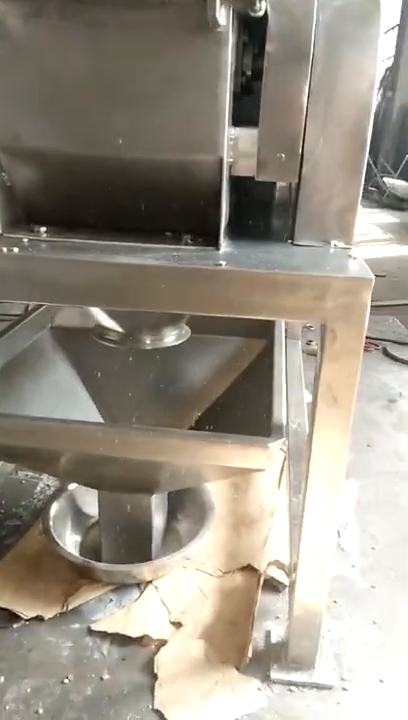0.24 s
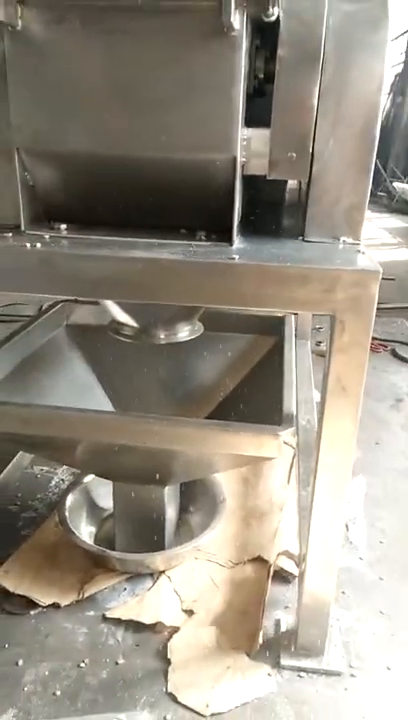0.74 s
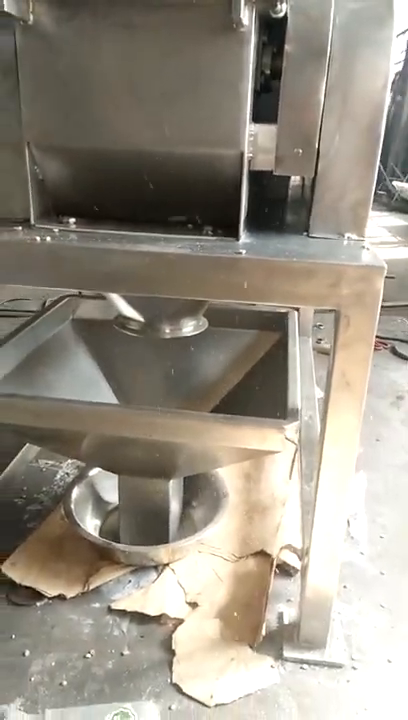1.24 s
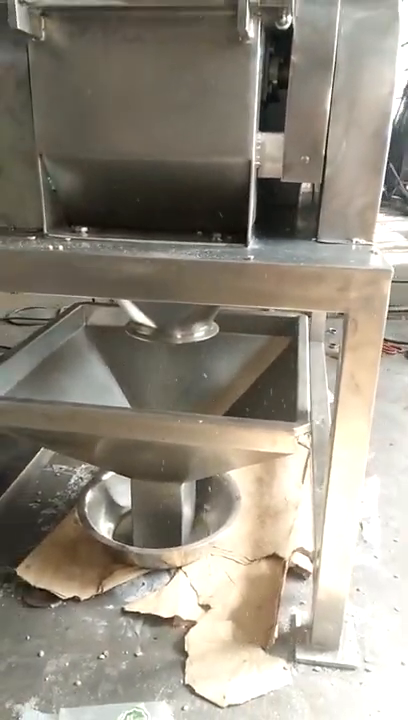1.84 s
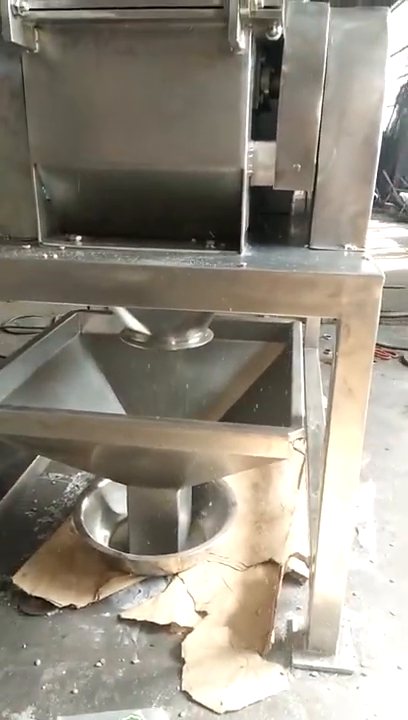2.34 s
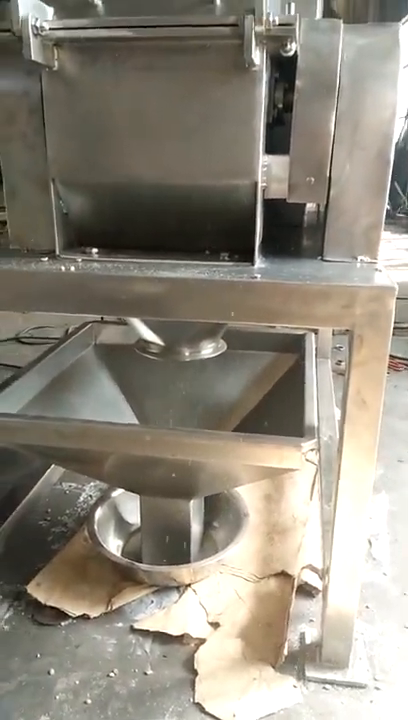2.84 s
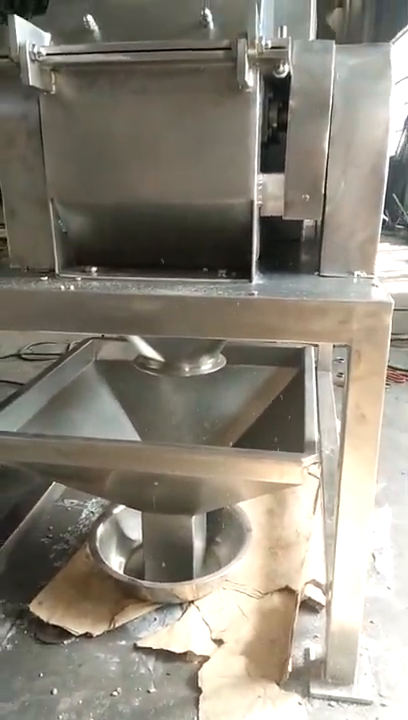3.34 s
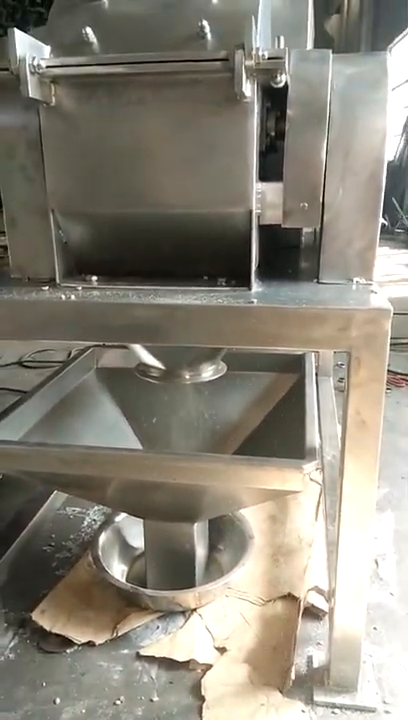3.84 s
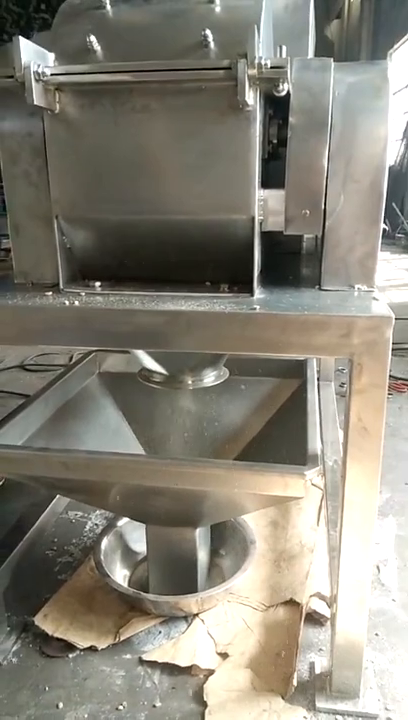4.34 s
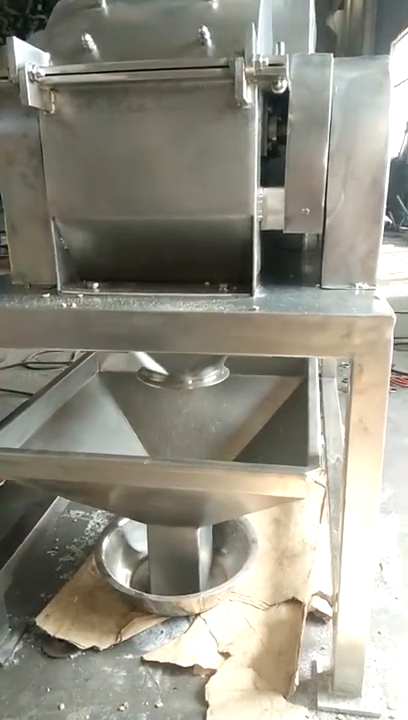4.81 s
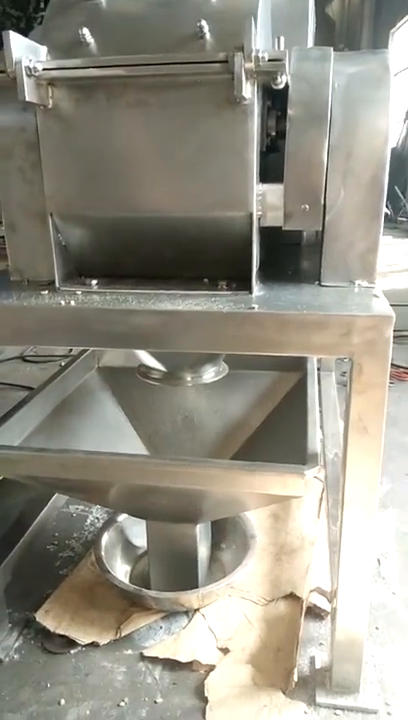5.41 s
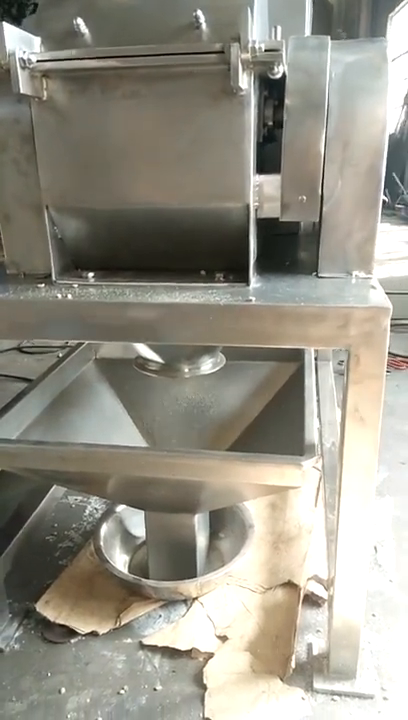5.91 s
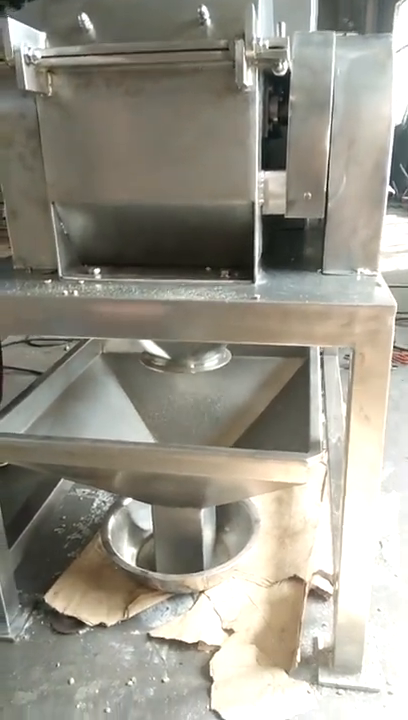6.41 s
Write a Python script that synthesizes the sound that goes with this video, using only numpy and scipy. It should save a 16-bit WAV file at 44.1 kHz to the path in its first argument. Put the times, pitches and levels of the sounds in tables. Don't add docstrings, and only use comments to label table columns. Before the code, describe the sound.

A steel hammer mill runs steadily indoors, droning and roaring with harsh hiss as broken beans rattle in bursts down a metal chute.

```python
import sys
import numpy as np
from scipy import signal
from scipy.fft import rfft, irfft
from scipy.io import wavfile
from scipy.ndimage import uniform_filter1d

SR = 44100
rng = np.random.default_rng(int(sys.argv[2]) if len(sys.argv) > 2 else 0)


def amplitude_ratio(level_db):
    exponent = np.asarray(level_db, float) / 20
    return 10 ** exponent


def wrap_up_sound(samples):
    columns = np.atleast_2d(samples).T
    tamed = np.clip(columns, -1, 1)
    steps = np.round(tamed * 32767).astype(np.int16)
    wavfile.write(sys.argv[1], SR, steps)


N = 293706

# (frequency [Hz], density [dB per Hz])
ROAR_SPECTRUM = [(30, -116), (60, -80.5), (120, -66), (250, -66), (450, -60), (750, -55.5), (1000, -57.5),
                 (1700, -56), (2200, -54.5), (2800, -48.5), (4200, -50.5), (5800, -60.5), (8500, -77.5),
                 (14200, -89.5)]


def evened(x):
    return x / np.sqrt(np.mean(x ** 2) + 1e-20)


def read(points, hz):
    f, value = np.transpose(points)
    return np.interp(np.log(hz + 1), np.log(f + 1), value)


def wander(count, knots):
    rough = rng.standard_normal((count, knots))
    place = np.linspace(0, knots - 1, N // 64 + 1)
    return np.array([np.interp(place, np.arange(knots), row) for row in rough])


def tones(turns, level_db, start):
    out = np.zeros(N)
    for turn, db, phase in zip(turns, level_db, start):
        wave = np.cos(np.float32(2 * np.pi * (turn + phase)))
        out += np.repeat(amplitude_ratio(db), 64)[:N] * wave
    return np.sqrt(2) * out


def rotor(hum_db=0.07, flutter_db=-0.2, whine_flutter_db=5.5, faint_db=2.0, faint_drift_db=7.0,
          judder_turns=0.0029):
    # (time [s], speed [rpm])
    rotor_speed = [
        (0, 2594.2),
        (2.3, 2591.6),
        (4.3, 2588.2),
        (6.66, 2586.5),
    ]
    # (multiple of rotor speed, direct rms [dB], echo lag at the start [cycles])
    hum_lines = [(4, -33.0, 0.51), (5, -44.0, 0.37), (6, -35.5, 0.47), (7, -26.5, 0.28), (8, -26.0, 0.41),
                 (9, -39.5, 0.22), (11, -39.5, 0.44), (12, -40.0, 0.44), (13, -41.0, 0.41),
                 (14, -26.5, 0.43), (15, -32.0, 0.28), (16, -35.5, 0.69), (17, -36.5, 0.35),
                 (18, -37.5, 0.86), (19, -42.5, 0.09), (20, -34.0, 0.11), (21, -46.5, 0.96),
                 (22, -49.0, 0.15), (23, -47.0, 0.3), (24, -40.0, 0.25), (25, -33.0, 0.07),
                 (26, -37.5, 0.76), (27, -45.5, 0.55), (28, -43.5, 0.96), (29, -51.5, 0.74),
                 (31, -52.5, 0.74), (33, -47.0, 0.91), (34, -49.5, 0.73), (35, -56.5, 0.94),
                 (36, -42.0, 0.97)]
    # (multiple of rotor speed, direct rms [dB], echo lag at the start [cycles])
    whine_lines = [(37, -46.0, 0.25), (38, -48.5, 0.74), (40, -52.5, 0.09), (41, -49.5, 0.75),
                   (42, -44.0, 0.03), (43, -38.0, 0.21), (44, -48.5, 0.74), (50, -44.5, 0.41),
                   (53, -42.0, 0.33), (54, -43.0, 0.9), (55, -44.0, 0.15), (56, -43.0, 0.48),
                   (57, -42.5, 0.94), (58, -45.5, 0.0), (59, -44.5, 0.42), (60, -42.5, 0.71),
                   (66, -48.0, 0.82), (67, -39.0, 0.67), (68, -54.0, 0.05), (71, -39.0, 0.11),
                   (72, -47.5, 0.82), (74, -45.0, 0.02), (75, -42.0, 0.21), (76, -42.0, 0.26),
                   (80, -49.5, 0.37), (88, -38.5, 0.7), (95, -40.5, 0.64), (101, -44.5, 0.89),
                   (103, -53.0, 0.73), (107, -41.0, 0.39)]
    panel_knocks = [(4, 8, 9, .77, .2), (10, 14, 14, .138, 0), (15, 15, 17, .41, 0), (18, 19, 22, .168, .2),
                    (23, 26, 28, .97, -.07)]
    t, slow = np.arange(N) / SR, np.arange(N // 64 + 1) * 64 / SR
    turns = np.cumsum(np.interp(t, *np.transpose(rotor_speed))) / 60 / SR % 1
    turns_per_s = rotor_speed[0][1] / 60

    strong, direct_db, lag = np.transpose([*hum_lines, *whine_lines])
    echo_gain = np.repeat([.8, .4], [len(hum_lines), len(whine_lines)])[:, None]
    detour_m, sound_m_per_s = .1, 343
    detour_s = detour_m / sound_m_per_s * slow / slow[-1]
    lag = lag[:, None] + np.outer(strong * turns_per_s, detour_s)
    strong_db = direct_db[:, None] + 20 * np.log10(abs(1 + echo_gain * np.exp(2j * np.pi * lag)))
    unrest_db = flutter_db + whine_flutter_db * strong[:, None] / 100
    strong_db += hum_db + unrest_db * wander(count=len(strong), knots=60)

    faint = np.setdiff1d(np.arange(30, 125), strong)
    drift_db = faint_drift_db * wander(count=len(faint), knots=9)
    over_roar_db = read(ROAR_SPECTRUM, faint * turns_per_s) + faint_db
    level_db = np.vstack([strong_db, over_roar_db[:, None] + drift_db])
    order = np.r_[strong, faint]
    start = rng.random(len(order))

    turns = turns + judder_turns * np.interp(t, slow, wander(count=1, knots=40)[0])
    for low, centre, high, delay, glide in panel_knocks:
        on_panel = (order >= low) & (order <= high)
        start = np.where(on_panel, glide * (order - centre) ** 2 - order * delay, start)
    slip = .65 * t / t[-1]
    return tones((k * turns + slip * (9 < k < 15) for k in order), level_db, start)


def fragments(per_s=6000, spread_db=2.5, gush=0.67, piece_db=43.0, ring_db=-29.5, spray_db=-30.5):
    # (time [s], level [dB])
    steady_flow = [
        (0, -52.5),
        (1.5, -48),
        (3.5, -46),
        (6.66, -45.5),
    ]
    # (time [s], level over the steady flow [dB], ebb [s])
    chute_gushes = [(0.139, 9, .03), (.3, 0, .04), (.65, 1, .05), (1.075, 14, .025), (1.19, 10, 0.054),
                    (1.35, -3, .03), (1.61, 4, .04), (2.19, 8, .08), (2.37, 2, .08), (2.69, 5, .1),
                    (2.99, 2, .08), (3.21, 0, .05), (3.82, 3, 0.067), (4.45, -1, .05), (4.6, 2, .02),
                    (5.45, 2, .04), (5.85, 2, .05), (6.12, -1, .05), (6.31, -1, 0.092)]
    # (time [s], peak level [dB])
    big_pieces = [(0.146, -37), (0.2944, -34), (0.3476, -37), (0.5694, -35), (0.6485, -32), (0.7094, -37),
                  (0.79, -39), (0.993, -38), (1.0705, -36), (1.087, -45), (1.1694, -40), (1.2194, -41),
                  (1.6194, -46), (2.1894, -39), (2.387, -36), (2.976, -38), (3.202, -38), (3.8117, -37),
                  (3.956, -38), (4.0287, -36), (4.37, -34), (4.596, -36), (4.777, -48), (5.063, -45),
                  (5.284, -46), (5.8945, -42), (6.12, -38), (6.304, -37)]
    chute_hz = [4890, 5190, 5370, 5630, 5770, 6390, 7400, 7540, 9060, 10910, 11490, 11670, 13010]
    # (level [dB], t60 [s])
    chute_rings = [(-3, 0.046), (-15.5, .05), (-2, 0.076), (-0.5, 0.032), (-2, 0.034), (-14, 0.034),
                   (-18.5, .04), (-12, .03), (-30, 0.036), (-23, 0.056), (-24, .03), (-23.5, .03),
                   (-27, .04)]
    # (frequency [Hz], density [dB per Hz])
    spray_spectrum = [(2500, -30), (4500, -0.5), (5800, 5), (7000, -7), (8500, -15.5), (11000, -16),
                      (14200, -15)]
    swell_share, rattle_s = 0.54, 0.011
    t = np.arange(N) / SR
    flow_db = np.interp(t, *np.transpose(steady_flow))
    for at, db, ebb in chute_gushes:
        pace_s = max(ebb, .01) * np.where(t < at, swell_share, 1)
        flow_db = flow_db + db * np.exp(-abs(t - at) / pace_s)
    power = amplitude_ratio(2 * gush * (flow_db + 47))
    for at, db in big_pieces:
        after = slice(round(at * SR), round(at * SR) + 4000)
        power[after] += amplitude_ratio(2 * (db + piece_db)) * np.exp(-(t[after] - at) / rattle_s)

    hit, patch = rng.random((2, N))
    spread = amplitude_ratio(spread_db * np.minimum(rng.exponential(1, N), 5))
    size = np.sqrt(power) * spread * (hit < per_s / SR)
    size *= rng.choice([-1., 1.], N)
    patch = (patch * len(chute_rings)).astype(int)
    ring, t = np.zeros(N), t[:4000]
    for k, (hz, (db, t60)) in enumerate(zip(chute_hz, chute_rings)):
        tap = amplitude_ratio(db - 60 * t / t60) * np.sin(2 * np.pi * hz * t)
        ring += signal.oaconvolve(size * (patch == k), tap)[:N]
    spray = irfft(rfft(size) * amplitude_ratio(read(spray_spectrum, np.fft.rfftfreq(N, 1 / SR))), N)
    return amplitude_ratio(ring_db) * evened(ring) + amplitude_ratio(spray_db) * evened(spray)


def roar(patchy_db=.2, drift_db=1.0, fill_db=1):
    stand_times = [.5, 6.1]
    # (frequency [Hz], width [Hz], lift at first stand [dB], at last stand [dB])
    housing_modes = [(320, 83, 12, 12), (420, 26, 5, 4.5), (591, 24, 4, 8), (845, 22, 8, 5.5),
                     (1106, 52, 7.5, 4), (1470, 180, 3.5, 3.5), (1690, 55, -5, -4), (1760, 53, 5, 5.5),
                     (2363, 240, 4, 4), (2893, 126, 4.5, 1), (3030, 40, -2, 4.5), (3190, 45, 3, 2),
                     (2724, 40, 6, 4.5), (3550, 67, -4, 3), (3900, 200, 1.5, 5), (4500, 84, 1.5, 5),
                     (771, 20, 12.5, 11.5), (124, 20, -7, -16), (484, 30, -0.5, -3), (970, 50, -2, -1.5),
                     (4400, 92, 4, -2), (2650, 55, -3.5, -4)]
    frames, hz = N // 512 + 5, np.fft.rfftfreq(2048, 1 / SR)
    a, b, short, long = rng.standard_normal((frames, 1025, 4)).T
    short = evened(uniform_filter1d(uniform_filter1d(short, size=20, axis=0), size=6, axis=1))
    long = evened(uniform_filter1d(uniform_filter1d(long, size=3, axis=0), size=200, axis=1))
    moved = np.interp(np.arange(frames) * 512 / SR, stand_times, [0, 1])
    lift_db = sum(np.outer(1 / (1 + (2 * (hz - f) / width) ** 2), first + (last - first) * moved)
                  for f, width, first, last in housing_modes)
    above_hum = (hz > 300)[:, None]
    drift = drift_db * long * above_hum
    filling = fill_db * (moved - .5) * above_hum
    level_db = read(ROAR_SPECTRUM, hz)[:, None] + lift_db + patchy_db * short + drift + filling
    z = (a + 1j * b) * amplitude_ratio(level_db)
    return signal.istft(z, nperseg=2048, noverlap=1536)[1][:N] * np.sqrt(SR / 2048) * amplitude_ratio(-1.5)


def motor(flutter_db=0.0):
    # (frequency [Hz], rms [dB])
    motor_lines = [(100, -57.5), (152, -57.5), (250, -53.5), (1028, -47.5)]
    hz, db = np.transpose(motor_lines)
    level_db = db[:, None] + flutter_db * wander(count=len(hz), knots=30)
    return tones(hz[:, None] * np.arange(N) / SR, level_db, rng.random(len(hz)))


def scene():
    mill = rotor() + fragments() + roar() + motor()
    return np.array([mill, mill])


def noise_swap(x, fresh_db=2.5):
    swap_edges = [4125, 4594, 5062, 5625, 6188, 6844, *range(7500, 14251, 750)]
    # (frequency [Hz], hurdle [spreads])
    swap_hurdle = [(4300, 2.0), (5000, 1.45), (5900, 1.2), (6500, 0.47), (7200, 0.51), (8600, 0.29),
                   (12000, 0.22), (14000, 0.39)]
    shape = dict(fs=SR, window="cosine", nperseg=1882, noverlap=941)
    hz, t, z = signal.stft(x, **shape)
    whim = rng.standard_normal((len(t), len(swap_edges)))
    whim = evened(uniform_filter1d(whim, size=4, axis=1))
    fresh = np.exp(2j * np.pi * rng.random(z.shape)) * np.sqrt(rng.exponential(1, z.shape))
    for k, (lo, hi) in enumerate(zip(swap_edges, swap_edges[1:])):
        band = (hz >= lo) & (hz < hi)
        swap = whim[:, k] > read(swap_hurdle, lo)
        level = amplitude_ratio(fresh_db) * np.sqrt(np.mean(abs(z[:, band]) ** 2, axis=1, keepdims=True))
        z[:, band] = np.where(swap, level * fresh[:, band], z[:, band])
    return signal.istft(z, **shape)[1][:, :N]


def top_cut(x):
    return signal.sosfilt(signal.butter(12, 15550, fs=SR, output="sos"), x)


def record(dry):
    power_db = 10 * np.log10(abs(uniform_filter1d(dry[0] ** 2, size=900)) + 1e-12)
    held = dry / amplitude_ratio(.42 * (power_db + 14.8))
    edge = signal.firwin(2047, 14255, window=("kaiser", 12), fs=SR)
    mix = signal.oaconvolve(noise_swap(held), edge[None], "same")
    return top_cut(mix)


dry = scene()
out = record(dry)
wrap_up_sound(out)
```